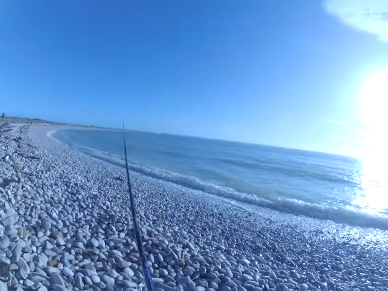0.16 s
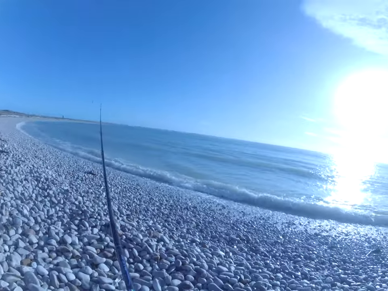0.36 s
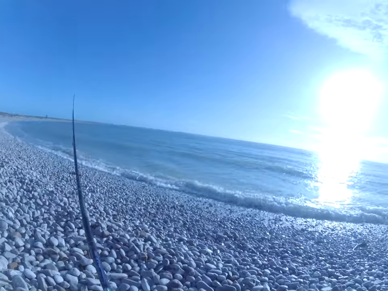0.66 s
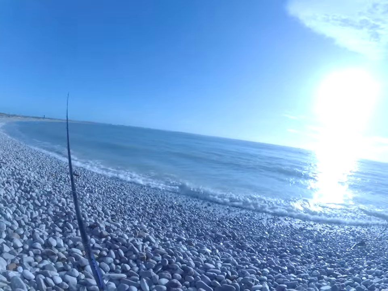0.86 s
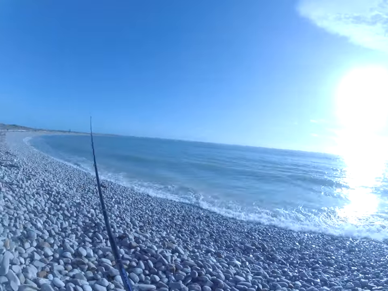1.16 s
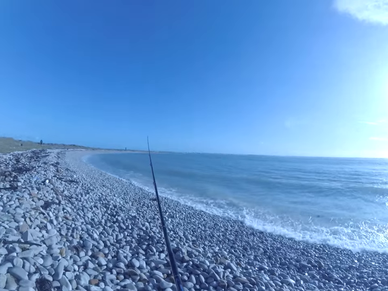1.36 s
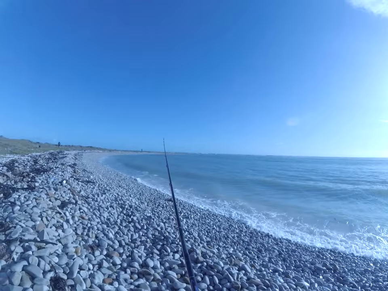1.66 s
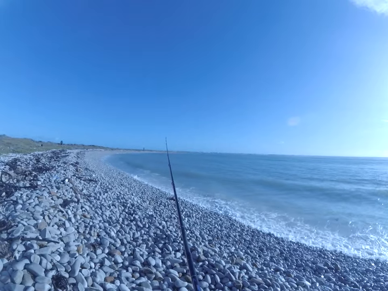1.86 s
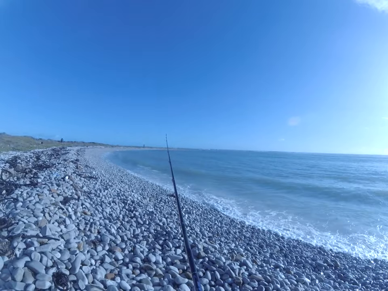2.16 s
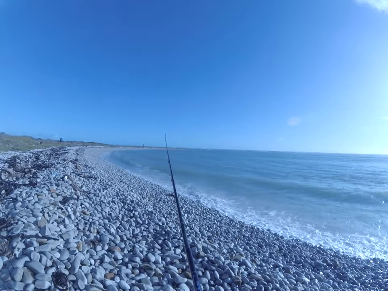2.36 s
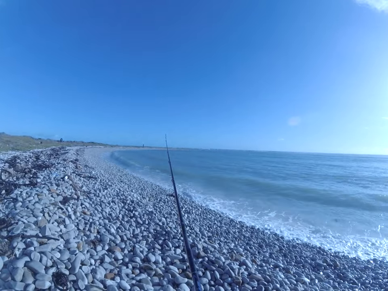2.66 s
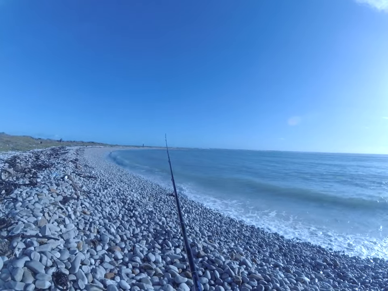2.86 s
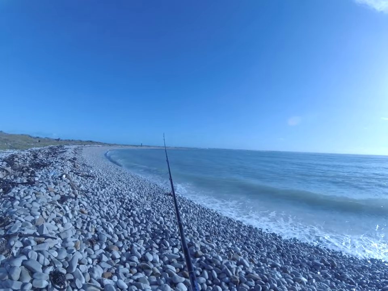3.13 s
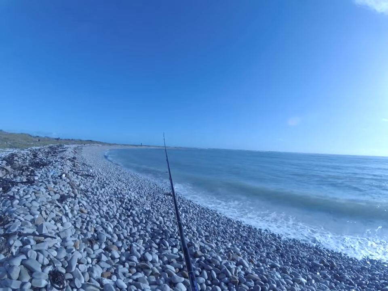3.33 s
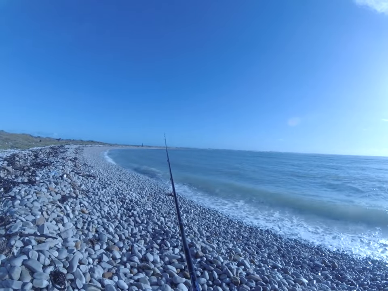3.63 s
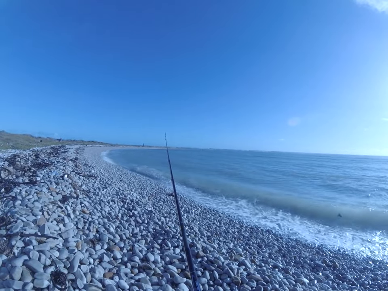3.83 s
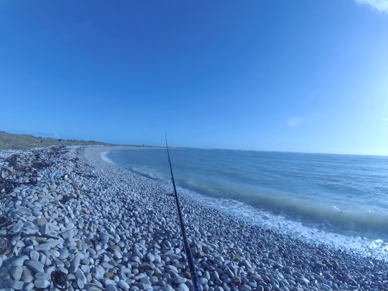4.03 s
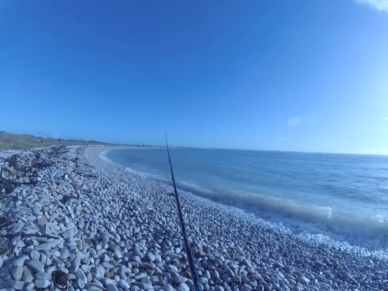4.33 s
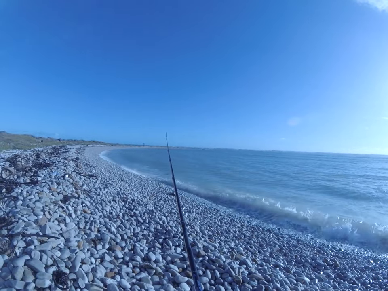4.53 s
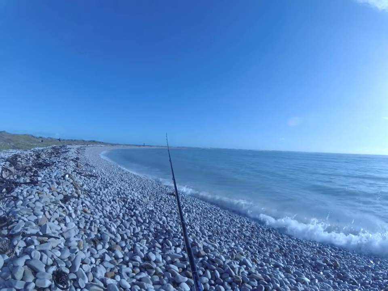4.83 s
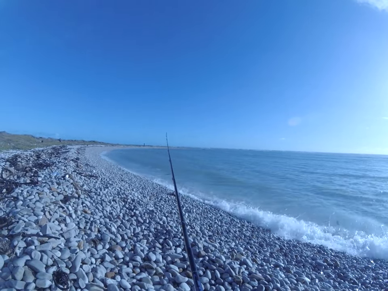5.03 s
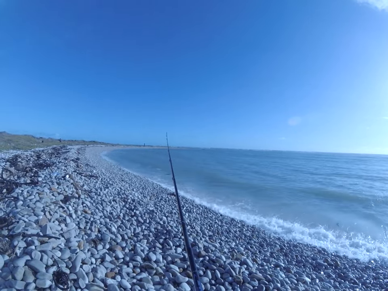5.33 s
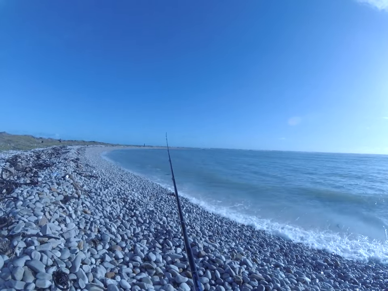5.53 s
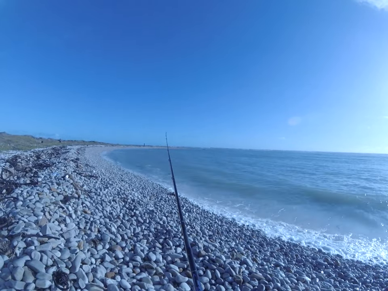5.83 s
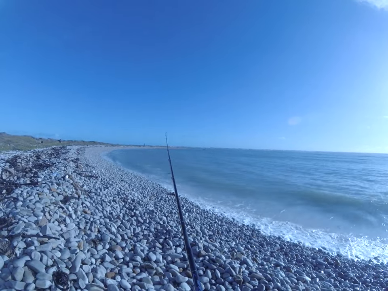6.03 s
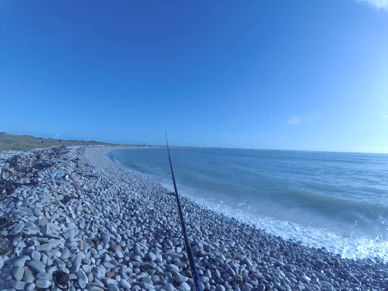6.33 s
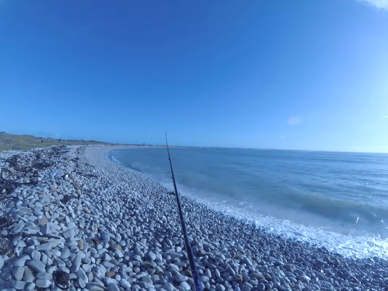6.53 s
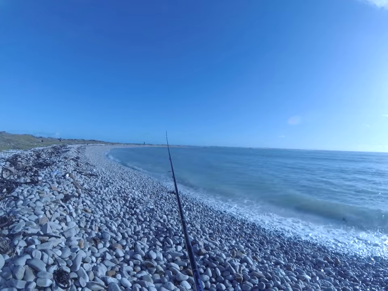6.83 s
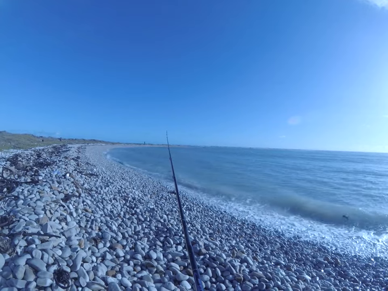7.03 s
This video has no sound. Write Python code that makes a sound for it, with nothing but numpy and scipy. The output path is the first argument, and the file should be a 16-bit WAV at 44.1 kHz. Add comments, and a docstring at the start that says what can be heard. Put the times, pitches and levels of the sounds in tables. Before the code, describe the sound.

Waves splash, gurgle and hiss up a shingle shore, rolling clacking pebbles, under low wind buffeting the microphone.

```python
"""Wind rumbles on a microphone port as a small wave, then a larger one, breaks on a steep pebble beach.
Each breaker thuds, splashes, throws hissing spray and drives under clouds of air that gurgle by bubble
resonance; the last backwash rolls stones that knock together. Turbulent gusts thump on the port,
whose cavity resonates near 6 kHz. The sound is mono."""
import sys
import numpy as np
from scipy import signal
from scipy.fft import rfft, irfft, next_fast_len
from scipy.io import wavfile
from scipy.ndimage import uniform_filter1d

SR = 44100
rng = np.random.default_rng(int(sys.argv[2]) if len(sys.argv) > 2 else 0)


def int16_out(signal):
    """Quantize to a 16-bit WAV file."""
    q = np.round(np.clip(np.atleast_2d(signal).T, -1, 1) * 32767)
    wavfile.write(sys.argv[1], SR, q.astype(np.int16))


N = 317079

# stones rolled by the water: (time [s], rattle level [dB])
ROLLING = [(0, -53), (0.9, -43.5), (1.8, -45), (2.4, -46), (3.2, -57.5), (3.55, -44), (4.5, -39),
           (5.3, -41.5), (6.1, -45.5), (6.55, -42.5), (6.85, -37.5), (7.08, -32.5)]
# the treble, opening with the first wave: (time [s], hiss level [dB], spray treble gain [dB])
TREBLE = [(0, -90, -28), (.6, -74, -6.5), (1.4, -62, 2.5), (2.5, -58.5, 2), (3.4, -55, -2.5), (4.7, -56, 4),
          (5.8, -55.5, 3.5), (7.19, -54.5, -5)]


def from_db(db):
    """Decibels to amplitude ratio."""
    return 10 ** (np.asarray(db) / 20)


def rms_one(x):
    """Normalisation to rms 1."""
    return x / np.sqrt(np.mean(x ** 2) + 1e-20)


def in_time(rows):
    """Linear interpolation of each column of a time table at every sample."""
    times, *columns = np.transpose(rows)
    return [np.interp(np.arange(N) / SR, times, column) for column in columns]


def add(out, s, sound):
    """Superposition of a short sound at time s."""
    at = int(np.clip(round(s * SR), 0, N - 1))
    out[at:at + len(sound)] += sound[:N - at]


def bell(x):
    """A Gaussian swell of height 1 around zero."""
    return np.exp(-np.minimum(x ** 2, 20))


def drift(corner_hz):
    """Slow random fluctuation of rms 1: noise twice through a one-pole low-pass."""
    step, settle = 40, 2000
    r = np.exp(-2 * np.pi * corner_hz * step / SR)
    noise = rng.standard_normal(N // step + settle + 2)
    slow = signal.lfilter([1], [1, -2 * r, r * r], noise)[settle:]
    return np.interp(np.arange(N) / step, np.arange(len(slow)), rms_one(slow))


def colour(x, spectrum):
    """Spectral shaping to rms 1, falling 12 dB per octave beyond the ends of the table."""
    size = next_fast_len(N)
    hz, db = np.transpose(spectrum)
    bins = np.maximum(np.arange(size // 2 + 1) * SR / size, 1)
    gain = from_db(np.interp(np.log(bins), np.log(hz), db))
    skirts = np.minimum(bins / hz[0], 1) ** 2 * np.minimum(hz[-1] / bins, 1) ** 2
    return rms_one(irfft(rfft(x, size) * gain * skirts, size)[:N])


def brighten(x, corner_hz, db):
    """A shelving filter whose gain above the corner varies in time."""
    low = signal.sosfiltfilt(signal.butter(3, corner_hz, fs=SR, output="sos"), x, padtype=None)
    return low + from_db(db) * (x - low)


def ring(clicks, hz, cycles):
    """A damped oscillator: each impulse starts a sine that falls 60 dB in so many cycles."""
    w = 2 * np.pi * hz / SR
    r = from_db(-60 * hz / (cycles * SR))
    return signal.lfilter([0, r * np.sin(w)], [1, -2 * r * np.cos(w), r * r], clicks + 1e-18)


def grains(per_s, low_hz, high_hz, cycles, spread_db, pitches=24):
    """A Poisson process of bubbles or contacts, uneven in size, each ringing at one pitch; rms 1."""
    born = np.flatnonzero(rng.random(N) < per_s / SR)
    sizes = from_db(spread_db * np.minimum(rng.exponential(1, N), 4)) * rng.choice([-1, 1], N)
    pitch_index, out = rng.integers(0, pitches, N), np.zeros(N)
    for k, hz in enumerate(np.geomspace(low_hz, high_hz, pitches)):
        clicks, onsets = np.zeros(N), born[pitch_index[born] == k]
        clicks[onsets] = sizes[onsets]
        out += hz * ring(clicks, hz, cycles)
    return rms_one(out)


def hiss():
    """Broadband noise lays a faint sheen over the treble."""
    spectrum = [(3000, 2), (9000, 3.5), (12000, -5.5), (14500, -8)]  # fine hiss: (frequency [Hz], spectral level [dB])
    hiss_db, _ = in_time(TREBLE)
    return from_db(hiss_db) * colour(rng.standard_normal(N), spectrum)


def gusting(flutter_db=2.5, gust_db=-1.8, gust_width=0.34, lull_db=-5):
    """Wind level in dB: the powers of breeze and gusts add, and each gust leaves a short lull."""
    breeze = [(0, -28.5), (0.5, -24), (1.25, -27.5), (1.7, -22.5), (2.05, -24), (2.45, -21.5), (2.8, -24),
              (3.1, -19.5), (3.55, -20), (4.1, -17.5), (4.5, -23), (5.0, -21), (5.45, -24.5), (6.0, -24),
              (6.62, -18), (7.19, -20.5)]  # breeze on the port: (time [s], level [dB])
    gusts = [(0.354, -21, 0.064), (0.635, -19.5, .065), (1.435, -21, 0.047), (1.616, -13.5, 0.13),
             (1.792, -17, 0.06), (3.255, -14, 0.081), (3.543, -11.5, 0.15), (3.663, -15.5, 0.074),
             (3.86, -17, 0.095), (3.982, -13, 0.061), (4.18, -21, 0.11), (4.414, -11, 0.091),
             (4.553, -9, 0.086), (4.787, -15, 0.14), (4.98, -9, .06), (5.188, -10, 0.06),
             (5.726, -18, 0.091), (6.154, -17.5, 0.15), (6.258, -14.5, 0.085), (6.54, -11.5, 0.13),
             (6.66, -10.5, 0.069), (6.804, -14, 0.085), (6.91, -13, 0.091), (7.09, -18, 0.16)]  # short gusts: (crest time [s], relative level [dB], time to the lull [s])
    breeze_db, = in_time(breeze)
    t, gust_power = np.arange(N) / SR, 0
    for s, db, length_s in gusts:
        age = (t - s) / length_s
        gust_power += from_db(db + gust_db) ** 2 * bell(age / gust_width)
        breeze_db += lull_db * bell((age - 1) / gust_width)
    breeze_power = from_db(breeze_db + flutter_db * drift(corner_hz=9)) ** 2
    return 10 * np.log10(gust_power + breeze_power)


def buffets(cycles=3.3, rise_s=0.0033):
    """Single eddies strike the port as heavily damped pressure oscillations."""
    eddies = [(1.776, 2.5, 75), (3.243, 6, 79), (3.537, 8, 95), (3.682, 3, 87.5), (3.978, -2, 60),
              (5.169, -7.5, 45), (5.719, 6, 82.6), (6.527, 3, 50), (6.654, 4, 152), (6.701, 4, 70),
              (6.784, 4, 71), (6.88, 3, 60), (6.938, 8.5, 146)]  # eddy impacts: (time [s], level [dB], frequency [Hz])
    out, t = np.zeros(N), np.arange(SR // 5) / SR
    for s, db, hz in eddies:
        add(out, s, from_db(db) * ring(t == 0, hz, cycles) * (1 - np.exp(-t / rise_s)))
    # the microphone passes no steady pressure
    return signal.sosfilt(signal.butter(1, 22, "high", fs=SR, output="sos"), out)


def wind(steadiness=0.25, eddy_s=0.068, brightening=0.051, flap_db=-16, ceiling=0.72):
    """Turbulent pressure fluctuations rumble on the port at the strength of the gust."""
    large_eddies = [(12, -12), (25, -5), (40, -0.5), (65, 0.5), (100, -4.5), (150, -10.5), (220, -17.5),
                    (300, -22.5), (400, -39.5), (1200, -44)]  # slow turbulence: (frequency [Hz], spectral level [dB])
    small_eddies = [(90, -2.5), (160, 4.5), (240, -3.5), (380, -22), (900, -19)]  # fast turbulence: (frequency [Hz], spectral level [dB])
    rumble_db = gusting()
    rumble = colour(rng.standard_normal(N), large_eddies)
    # chance swells are partly evened out, so that the gust sets the strength
    power = uniform_filter1d(rumble ** 2, int(eddy_s * SR)) + 1e-6
    rumble = rms_one(rumble / power ** (steadiness / 2))
    # small eddies ride on the large ones, the more so in a strong gust
    flap = rms_one(colour(rng.standard_normal(N), small_eddies) * np.abs(rumble))
    flap *= from_db(flap_db + brightening * (rumble_db - rumble_db.mean()))
    pressure = from_db(rumble_db) * (rumble + flap) + buffets()
    return pressure / (1 + (pressure / ceiling) ** 4) ** (1 / 4)  # saturation rounds the hardest thumps


def rolling_stones():
    """Tumbling stones rattle by sparse, heavily damped impacts."""
    spectrum = [(450, -23), (700, -20), (1000, 8.5), (1400, 0.5), (2200, -11), (3300, -22), (4500, -13),
                (9000, -38)]  # stone contacts: (frequency [Hz], spectral level [dB])
    rattle_db, = in_time(ROLLING)
    return from_db(rattle_db) * colour(grains(260, 544, 3650, cycles=2.7, spread_db=2.5), spectrum)


def knocking_stones(clack_db=-4, clack_s=0.0016, tick_s=0.0024, tick_dull_hz=5000):
    """Wet stones clack and excite cavity resonance in the gaps between them; dry ones only tick."""
    # knocks in the backwash: (time [s], level [dB], frequency [Hz], ring length [cycles])
    knocks = [(6.531, -16.5, 1020, 26), (6.56, -14.5, 939, 15), (6.632, -19, 704, 26), (6.65, -13, 890, 42),
              (6.757, -15, 700, 8), (6.773, -13, 905, 18), (6.799, -10.5, 956, 6.8), (6.828, -14, 540, 14),
              (6.832, -7.5, 1400, 4.3), (6.843, -14.5, 534, 23), (6.846, -10, 1140, 9.8),
              (6.924, -13, 1560, 5.8), (6.982, -11, 1040, 13), (7.028, -11.5, 1080, 16),
              (7.055, -11.5, 826, 23), (7.121, -8, 1020, 13)]
    ticks = [(2.81, -41), (3.032, -40), (3.046, -31), (3.05, -25), (3.074, -38), (3.327, -32), (6.213, -35),
             (6.247, -28)]  # dry pebbles close by: (time [s], level [dB])
    out, t = np.zeros(N), np.arange(SR // 12) / SR
    clack_band = signal.butter(5, [700, 3300], "band", fs=SR, output="sos")
    tick_band = np.vstack([signal.butter(6, [4800, 10500], "band", fs=SR, output="sos"),
                           signal.butter(1, tick_dull_hz, fs=SR, output="sos")])
    for s, db, hz, cycles in knocks:
        clack = signal.sosfilt(clack_band, rng.standard_normal(len(t)) * np.exp(-t / clack_s))
        add(out, s, from_db(db) * (ring(t == 0, hz, cycles) + from_db(clack_db) * clack))
    for s, db in ticks:
        tick = signal.sosfilt(tick_band, rng.standard_normal(len(t)) * np.exp(-t / tick_s))
        add(out, s, from_db(db) * tick)
    return out


def trickle(gain_db=1):
    """Water drains between the rolling stones in many brief resonances."""
    spectrum = [(900, -7), (1400, 2.5), (2100, -.5), (3100, -4), (4000, -9), (6000, -16)]  # draining water: (frequency [Hz], spectral level [dB])
    rattle_db, = in_time(ROLLING)
    bubbles = grains(1500, 1080, 4640, cycles=5.6, spread_db=1.5)
    return from_db(rattle_db + gain_db) * colour(bubbles, spectrum)


def gulps(cycles=36, rise=0.028, attack_s=0.0025):
    """Bubble resonance: a big air pocket rings, its pitch climbing as it nears the surface."""
    pockets = [(5.16, -12, 422), (5.325, -9.5, 420), (5.35, -9.5, 734), (5.372, -9.5, 446),
               (5.405, -12.5, 504), (5.432, -9.5, 414), (5.514, -12.5, 712)]  # air in the collapsing breaker: (time [s], level [dB], starting pitch [Hz])
    out, t = np.zeros(N), np.arange(SR // 5) / SR
    for s, db, hz in pockets:
        age = t * hz / cycles
        note = np.sin(2 * np.pi * hz * t * (1 + rise * age)) * np.exp(-np.log(1000) * age)
        add(out, s, from_db(db) * note * (1 - np.exp(-t / attack_s)))
    return out


def water(near_grains, spectrum, blur_db, flutter_db, flutter_hz):
    """Countless far grains sum to noise behind the near ones; tumbling modulates the amplitude."""
    mix = near_grains + from_db(blur_db) * rng.standard_normal(N)
    return rms_one(colour(mix, spectrum) * from_db(flutter_db * drift(flutter_hz)))


def follow(vigour, crests, db, exponent, crest_db, lag_s=0):
    """A power law turns vigour, after any first-order lag, into gain; toppling crests act at once."""
    if lag_s:
        r = np.exp(-1 / (lag_s * SR))
        vigour, _ = signal.lfilter([1 - r], [1, -r], vigour, zi=[r * vigour[0]])
    return from_db(db) * np.hypot(vigour, from_db(crest_db) * crests) ** exponent


def spray(vigour, crests):
    """The finest drops fizz through the shingle as dense, high-pitched impacts."""
    spectrum = [(2200, -8.5), (3800, 1), (5000, 1), (6500, -0.5), (7600, -4), (9000, -8), (10000, -17),
                (10900, -17), (12000, -35), (14500, -62)]  # fine drops: (frequency [Hz], spectral level [dB])
    _, treble_db = in_time(TREBLE)
    drops = grains(4000, 3540, 13800, cycles=7, spread_db=2.5)
    fizz = water(drops, spectrum, blur_db=6.5, flutter_db=0.92, flutter_hz=7)
    gain = follow(vigour, crests, db=-34, exponent=1.0, crest_db=-2.5)
    return gain * brighten(fizz, corner_hz=8300, db=treble_db)


def splash(vigour, crests, sharpening=0.27):
    """Drop impacts: a harder splash tears the water into finer drops and so sounds brighter."""
    spectrum = [(700, -10), (1200, -2), (1600, 0.5), (2200, -1.5), (3100, -3), (4000, -9), (5500, -14),
                (9000, -44)]  # falling drops: (frequency [Hz], spectral level [dB])
    drops = grains(2200, 1105, 4900, cycles=9.8, spread_db=1.0)
    patter = water(drops, spectrum, blur_db=8.5, flutter_db=0.5, flutter_hz=10)
    gain = follow(vigour, crests, db=-33.5, exponent=0.7, crest_db=4)
    return gain * brighten(patter, corner_hz=2300, db=sharpening * 20 * np.log10(vigour))


def wash(vigour, crests, drain_db=5.5):
    """Churning water: the breaking wave and the flow through the rolling stones add in power."""
    spectrum = [(350, 0), (550, -2), (750, 1), (980, -1), (1250, -7), (1700, -16), (3500, -29)]  # churning water: (frequency [Hz], spectral level [dB])
    rattle_db, = in_time(ROLLING)
    bubbles = grains(1100, 497, 1670, cycles=9.4, spread_db=1.0)
    churn = water(bubbles, spectrum, blur_db=4.5, flutter_db=0.3, flutter_hz=11)
    gain = follow(vigour, crests, db=-30.5, exponent=0.79, crest_db=2, lag_s=0.18)
    return np.hypot(gain, from_db(rattle_db + drain_db)) * churn


def bubble_cloud(vigour, crests, thud_db, entrained_db=-2.5):
    """Entrained air gurgles by bubble resonance; a heavy plunge drives more of it under."""
    spectrum = [(100, -43), (180, -5.5), (280, 1.5), (430, 0), (580, -3), (800, -13.5), (1400, -40)]  # submerged air: (frequency [Hz], spectral level [dB])
    bubbles = grains(700, 198.7, 781, cycles=23.0, spread_db=2.0)
    gurgle = water(bubbles, spectrum, blur_db=-3.5, flutter_db=0.54, flutter_hz=39)
    gain = follow(vigour, crests, db=-32, exponent=0.72, crest_db=2, lag_s=0.34)
    return np.hypot(gain, from_db(thud_db + entrained_db)) * gurgle


def toppling(rise_s=0.02, fall_s=0.035):
    """The envelope of falling crests: each swells quickly, holds and decays exponentially."""
    crests = [(0.715, -4.5, 0.17), (1.06, -0.5, 0.14), (3.53, -2.5, 0.22), (3.86, 1, 0.032),
              (4.75, 4.5, .06), (5.15, -1.5, .19)]  # crests that topple at once: (time [s], vigour [dB], hold [s])
    out, t = np.zeros(N), np.arange(SR) / SR
    for s, db, hold_s in crests:
        decay = np.exp(-np.maximum(t - rise_s - hold_s, 0) / fall_s)
        add(out, s, from_db(db) * np.minimum(t / rise_s, 1) * decay)
    return out


def surf():
    """A breaking wave gives up its energy to a low impact thud, bubbles and drops."""
    breaking = [(0, -16), (0.3, -9), (0.75, -2), (1.22, -0.5), (1.7, -6), (2.2, -13.5), (2.85, -19),
                (3.32, -16.5), (3.53, -3), (4.1, 0), (4.5, 3), (4.85, 4), (5.3, 3), (5.48, -3.5),
                (5.74, -6.5), (5.92, -17), (6.75, -13.5), (7.19, -6)]  # how hard the water breaks: (time [s], vigour [dB])
    plunge = [(0, -45), (.4, -34), (1.15, -35.5), (1.6, -36), (3.4, -42), (3.9, -31.5), (4.2, -30.5),
              (4.6, -24.5), (5.2, -23.5), (5.6, -27.5), (6.2, -38.5), (7.19, -46.5)]  # the breaker's weight falling on the beach: (time [s], level [dB])
    thud_spectrum = [(70, -3), (120, 2.5), (150, -3.5), (200, -0.5), (270, -9), (400, -25)]  # its impact: (frequency [Hz], spectral level [dB])
    vigour_db, = in_time(breaking)
    thud_db, = in_time(plunge)
    vigour, crests = from_db(vigour_db), toppling()
    thud = from_db(thud_db) * colour(rng.standard_normal(N), thud_spectrum)
    return (thud + bubble_cloud(vigour, crests, thud_db) + wash(vigour, crests)
            + splash(vigour, crests) + spray(vigour, crests))


def scene():
    """Superposition of hiss, sea, stones and wind, the same in both ears."""
    mono = hiss() + surf() + trickle() + gulps() + knocking_stones() + rolling_stones() + wind()
    return np.stack([mono, mono])


def record(dry, stopband_hz=15200):
    """Cavity resonance in the port colours the treble; a steep low-pass cuts the top."""
    port = [(4280, 1010, -6), (5170, 910, 4), (5910, 980, 7.5), (6507, 395, 8)]  # the cavity's dip and peaks: (frequency [Hz], width [Hz], gain [dB])
    for hz, width_hz, db in port:
        w, half_width, g = 2 * np.pi * hz / SR, np.pi * width_hz / SR, from_db(db / 2)
        numerator = [1 + half_width * g, -2 * np.cos(w), 1 - half_width * g]
        denominator = [1 + half_width / g, -2 * np.cos(w), 1 - half_width / g]
        dry = signal.lfilter(numerator, denominator, dry)
    return signal.sosfilt(signal.cheby2(14, 70, stopband_hz, fs=SR, output="sos"), dry)


dry = scene()
out = record(dry)
int16_out(out)
```